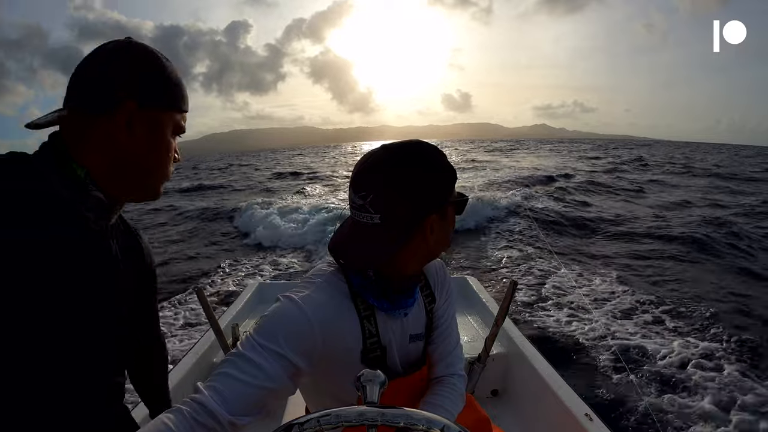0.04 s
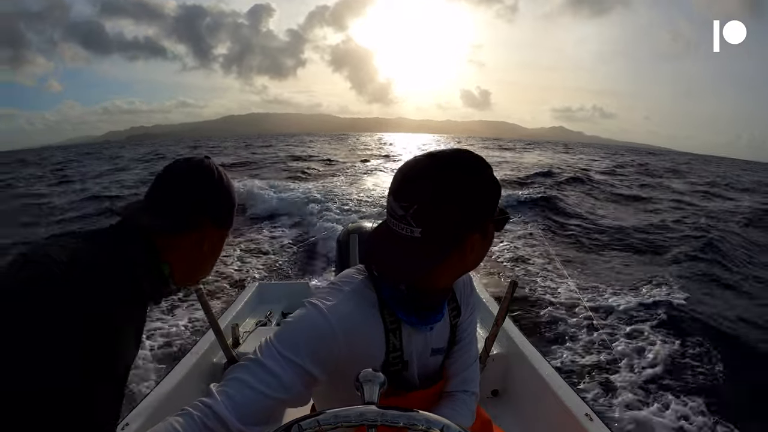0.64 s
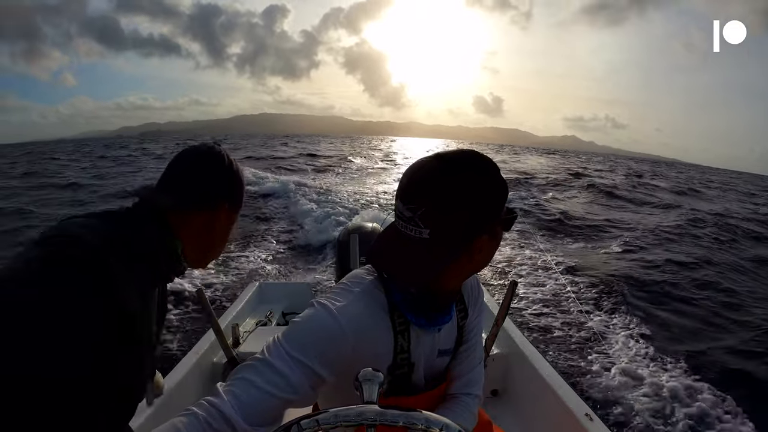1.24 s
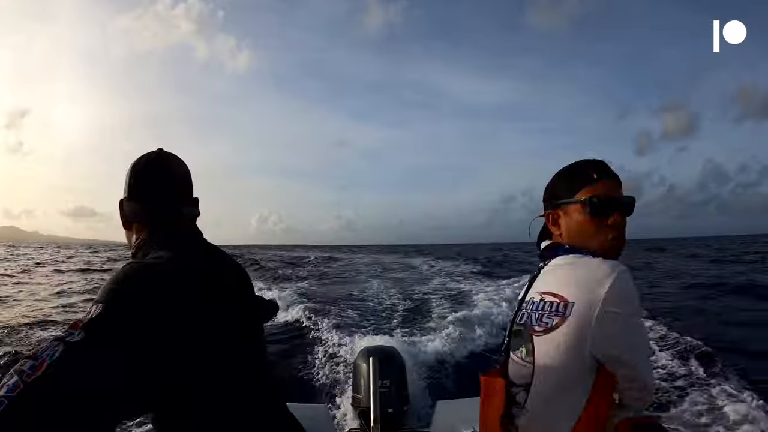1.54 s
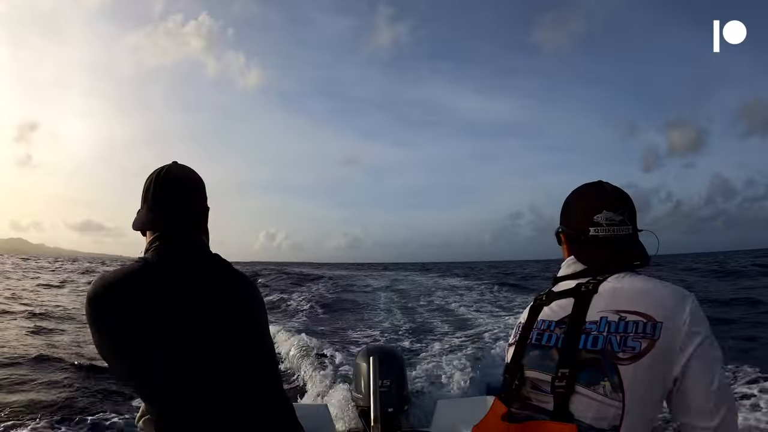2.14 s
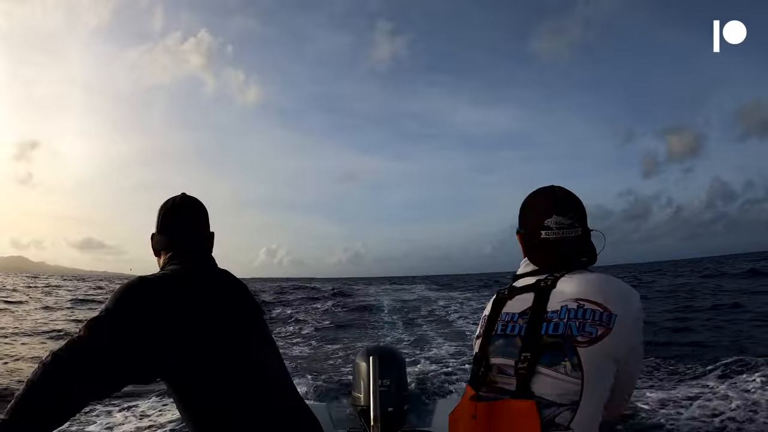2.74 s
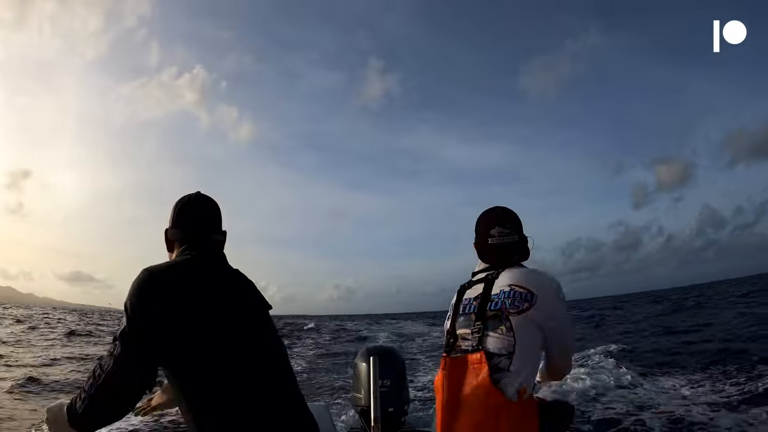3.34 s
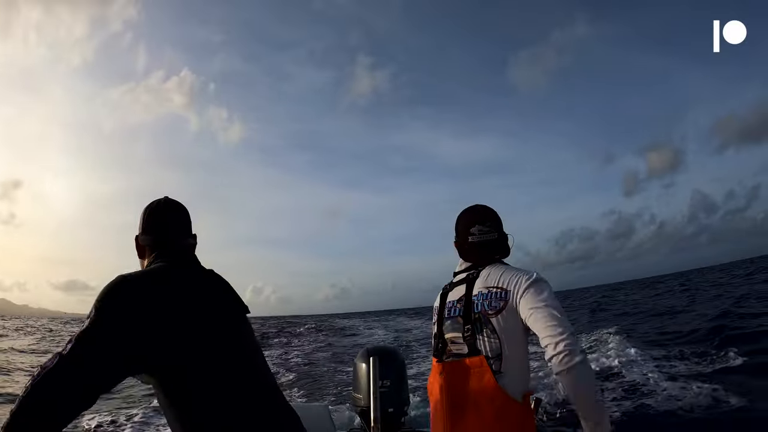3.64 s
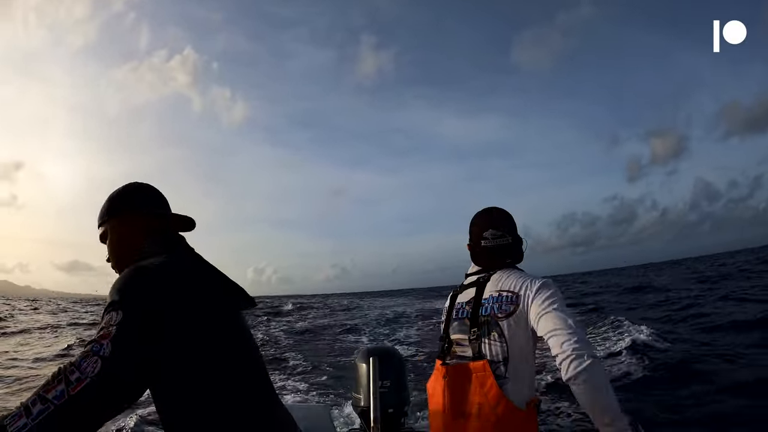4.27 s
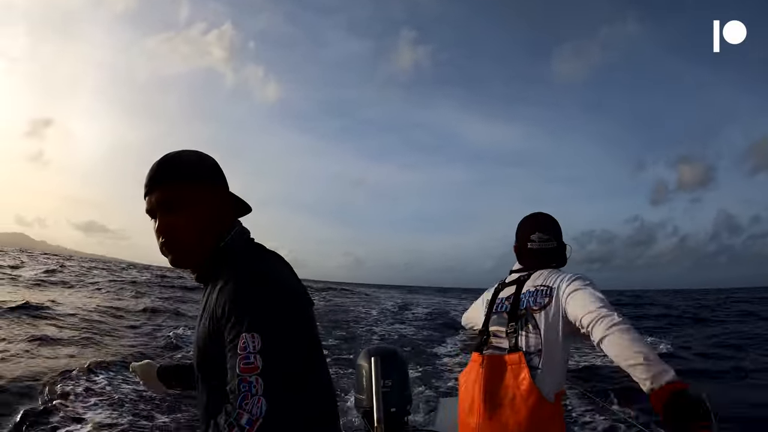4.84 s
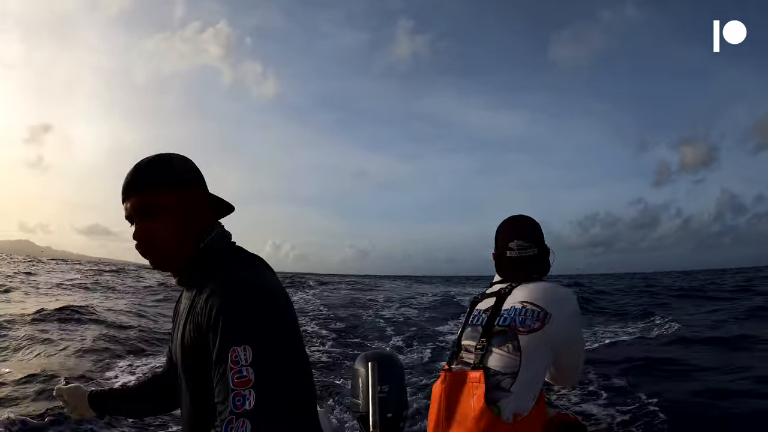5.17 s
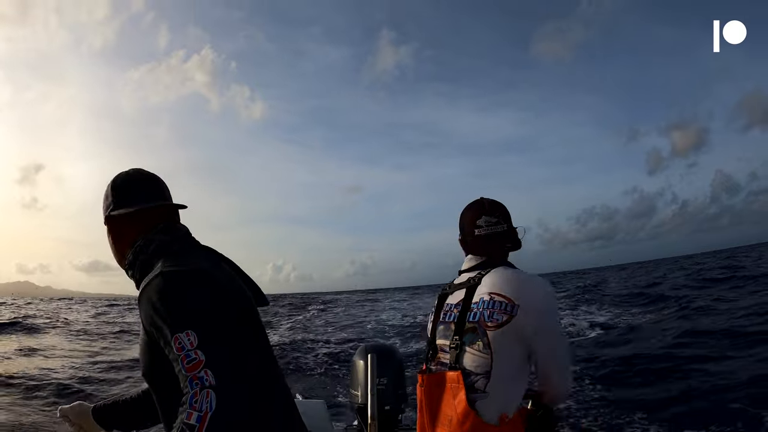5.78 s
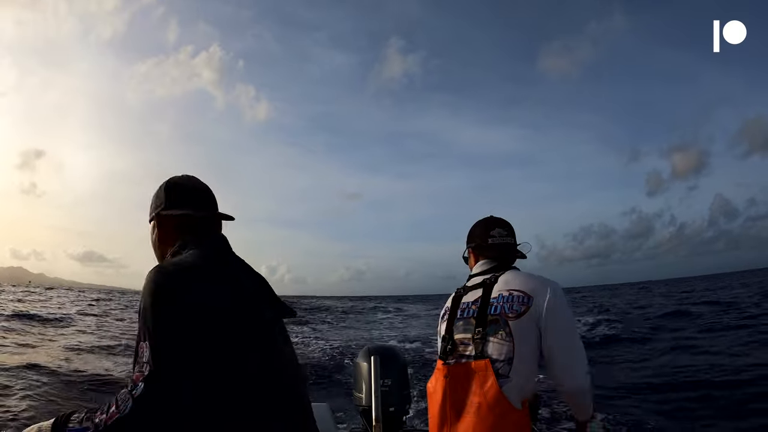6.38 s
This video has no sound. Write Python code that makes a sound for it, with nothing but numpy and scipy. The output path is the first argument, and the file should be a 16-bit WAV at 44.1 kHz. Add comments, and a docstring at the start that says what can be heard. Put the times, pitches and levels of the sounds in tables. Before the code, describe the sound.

An outboard motor drones close by at speed, with a gear whine and light mechanical clatter, while wind puffs across the microphone on board a small boat. At about 1.5 seconds the sound cuts to a brief silence. It fades back in by 1.7 seconds with the motor running a little slower under the rush and spray of the wake, strongest from 2 to 2.5 seconds, with a slap on the hull. The motor throbs around 2 and 3.7 seconds, then sinks in pitch, booms briefly near 4.5 seconds and fades into the background. From 4.7 to 6 seconds, waves thump and slap the hull in quick, uneven succession and spray spatters the deck. A loose metal fitting rattles faintly at 6 seconds. Low wind gusts buffet the microphone over softer water until the end, at about 6.5 seconds.

```python
"""An outboard motor drones at speed with a gear whine, heard close up from a small skiff on choppy sea.
After a short silence it labours and eases off under the rush of the wake. Waves thump and slap the hull,
spray lands on deck, a loose metal fitting rattles and wind buffets the on-board microphone.
The motor is a set of tones tied to its firing rate, water and wind are shaped noise,
and the hull and the fitting ring when struck."""
import sys
import numpy as np
from scipy import signal
from scipy.fft import rfft, irfft, next_fast_len
from scipy.io import wavfile
from scipy.ndimage import uniform_filter1d, map_coordinates

SR = 44100
rng = np.random.default_rng(int(sys.argv[2]) if len(sys.argv) > 2 else 0)


def transcribe(u):
    """Save the signal u as a 16-bit wav file named by the first command-line argument.

    u: samples, shape (n,) or (channels, n), limited to [-1, 1]; the rate is SR.
    q: integer samples, one column per channel.
    """
    v = np.clip(np.atleast_2d(u).T, -1, 1)
    q = np.round(v * 32767).astype(np.int16)
    wavfile.write(sys.argv[1], SR, q)


N = 287091
TIME = np.arange(N) / SR

# motor speed, cruising and easing off: (time [s], firing rate [Hz])
CRUISE_FIRING = [(0, 96.56), (.35, 95.54), (.55, 97.6), (1.0, 97.47), (1.48, 97.66)]
EASE_FIRING = [(1.64, 93.4), (1.98, 93.8), (2.28, 88.5), (2.8, 90.43), (3.05, 91.3), (3.35, 93.8),
               (3.6, 91.56), (3.8, 88.3), (4.2, 83.4), (4.45, 81.4), (4.6, 75.04), (4.8, 74.2),
               (5.5, 86.45), (6.3, 91.8)]
# tones of the drone: (multiple of firing rate [ratio], level [dB])
CRUISE_TONES = [(.5, -25.5), (1, -1), (2, -22.5), (3, -15.5), (4, -28.5), (5, -26.5), (6, -27.5), (7, -31),
                (9, -38)]
EASE_TONES = [(0.99, 0), (1.6, -25), (2, -27.5), (3.3, -24), (10 / 3, -20.5), (6, -33)]
# exhaust note, briefly smothered by the wake, then fading: (time [s], level [dB])
EXHAUST_LEVEL = [(1.78, -21.5), (2.0, -33), (2.13, -33), (2.26, -18.5), (2.98, -16), (3.1, -18.5),
                 (3.48, -21), (3.6, -20), (3.97, -22), (4.22, -29), (5.3, -36.5), (6.2, -45), (6.45, -34.5)]
# resonances: (frequency [Hz], width [Hz], level [dB])
WHINE_BANDS = [(71.3, 1.8, -37.5), (417, 3.1, -50), (704, 3.2, -54.5), (883, 16, -49.5), (1220, 24, -49),
               (1222, 8, -46.5), (1503, 8.2, -47.5), (1826, 15, -49), (3070, 36, -60.5)]  # hull, gears and cowl
PANEL_MODES = [(135.4, 20, 6), (220, 66, 7), (265, 25, 12), (366, 63, 6.5), (438, 120, 4.5),
               (626.5, 153, -1.5), (927, 200, -5.5), (1325, 257, -9), (1870, 190, -10.5), (2450, 1400, -17)]  # bottom panels
# water thrown up alongside: (time [s], wash level [dB], spray level [dB])
WAKE_LEVELS = [(1.72, -34.5, -39.5), (1.98, -24, -32.5), (2.23, -27, -37), (2.33, -24.5, -35),
               (2.55, -29, -37), (3.05, -33, -45), (3.6, -38, -47.5), (4.1, -37, -49), (4.48, -39.5, -47),
               (4.7, -32.5, -47), (5.05, -37.5, -44.5), (5.3, -32, -41.5), (5.55, -41.5, -50),
               (6.05, -39, -52.5), (6.5, -45, -53.5)]
# waves against the hull: (time [s], level [dB], nominal pitch [Hz])
WAVE_THUMPS = [(4.713, -3.5, 201), (4.76, -10, 89), (4.85, -12.5, 246), (4.997, -10.5, 231.6),
               (5.013, -8, 124.6), (5.403, -4, 97), (5.43, -7, 136), (5.456, -14, 49.4), (5.784, -16, 85.3),
               (5.845, -13, 93), (6.0, -7.5, 144.6), (6.034, -5, 48.6)]
# flat slaps underfoot: (time [s], rms level [dB], brightness [Hz], t60 [s])
PANEL_SLAPS = [(2.305, -31.5, 1300, 0.22), (2.49, -40, 1296, .35), (3.895, -43, 900, 0.36),
               (4.525, -37.5, 900, 0.65), (4.718, -28.5, 220, 0.24), (4.908, -27, 750, 0.15),
               (5.346, -27, 2003, 0.19), (5.409, -31, 650, 0.27), (5.635, -31, 500, 0.13),
               (5.902, -30, 750, 0.13), (5.997, -32, 437, 0.47)]
# spray landing on deck: (time [s], level [dB], treble edge [Hz], t60 [s])
DECK_SPLATS = [(4.904, -39.5, 7000, 0.074), (5.221, -26.5, 8080, 0.031), (5.266, -36.5, 5000, .12),
               (5.335, -45, 5000, 0.074), (5.402, -37.5, 6000, 0.35), (5.63, -35, 4240, 0.067),
               (5.737, -35.5, 5500, 0.032), (5.752, -43.5, 4200, 0.14), (5.843, -40, 4300, .11),
               (5.896, -38.5, 5010, 0.066)]
# metal contacts: (time [s], level [dB])
FITTING_HITS = [(5.988, -51), (6.003, -46.5), (6.0253, -46), (6.0586, -49.5)]
# ring of the fitting: (frequency [Hz], level [dB], t60 [s])
FITTING_MODES = [(2030, 2, 0.13), (2360, -2, .12), (3250, -9, 0.15), (3600, -12, 0.6), (4860, -2, 0.12),
                 (5150, -6.5, .08), (5450, -4, 0.073), (6000, -6.5, 0.14), (5950, -12.5, .08)]
# bell-shaped swells: (peak time [s], level [dB], half length [s])
SHAFT_THROBS = [(2.05, -22.5, 0.27), (3.72, -26.5, 0.35)]
CRUISE_PUFFS = [(.43, -23, 0.033), (.6, -27.5, 0.11), (1.39, -23.5, 0.025)]  # wind at speed
EASE_GUSTS = [(2.16, -23, 0.046), (3.08, -27, .04), (4.86, -25, 0.077), (5.1, -26.5, 0.11),
              (5.56, -21.5, .1), (6.08, -22.5, 0.15), (6.3, -29, 0.072)]  # wind while easing off
# noise spectra: (frequency [Hz], relative level [dB])
CLATTER_SPECTRUM = [(250, -8), (400, 3.5), (600, 5.5), (790, -3), (920, -2), (1100, -6), (1250, -0.5),
                    (1600, -2.5), (1880, -5.5), (2100, -12), (3100, -10), (4200, -19), (6500, -28),
                    (9000, -29), (10700, -40), (12500, -40.5), (15500, -59)]  # motor mechanics
CHURN_SPECTRUM = [(35, -31.5), (70, 1), (120, 0), (200, 0.5), (280, -1.5), (380, -16.5), (600, -33),
                  (4000, -110)]  # low turbulence of water or air
WASH_SPECTRUM = [(150, -8), (340, -5), (480, -1.5), (600, 0.5), (800, -7), (1000, -8), (1400, -20.5),
                 (2200, -27.5), (9000, -85.5)]  # water along the hull
SPRAY_SPECTRUM = [(800, -28), (1400, -11), (1750, -7), (2150, 0.5), (2800, -3), (3500, -9.5), (4300, -14),
                  (5100, -13.5), (6000, -18.5), (7500, -23.5), (8800, -23), (10500, -28.5), (11700, -42.5),
                  (15500, -58.5)]  # flying drops
FIZZ_SPECTRUM = [(2500, -14), (5000, 13.5), (9500, -18.5), (10800, -20), (12000, -27.5), (15000, -57.5)]  # finest drops
RUMBLE_SPECTRUM = [(12, -7.5), (26, 3.5), (34, 0.5), (65, -6), (100, -24), (300, -52), (2000, -120)]  # wind on the microphone
AIR_SPECTRUM = [(3000, -50.5), (8000, -16.5), (10500, -7), (12300, -0.5), (14000, -5.5), (15500, -16.5)]  # thin background hiss


def amp(db):
    """Decibels to gain."""
    return 10 ** (np.asarray(db) / 20)


def unit(x):
    """Scale to rms 1."""
    return x / np.sqrt(np.mean(x ** 2) + 1e-20)


def curves(rows):
    """One value per sample for each column after the time."""
    times, *columns = np.transpose(rows)
    return [np.interp(TIME, times, column) for column in columns]


def wobble(rate):
    """A smooth random curve, rate knots a second."""
    return map_coordinates(rng.standard_normal(int(N * rate / SR) + 4), [TIME * rate])


def swells(rows, rest_db):
    """Gain of bell-shaped swells over a resting level."""
    power = sum((amp(db) * np.exp(-.5 * ((TIME - s) / half) ** 2)) ** 2 for s, db, half in rows)
    return np.sqrt(amp(rest_db) ** 2 + power)


def filtered(x, response):
    """x through a frequency response."""
    size = next_fast_len(len(x) + SR // 4)
    return irfft(rfft(x, size) * response(np.fft.rfftfreq(size, 1 / SR)), size)[:len(x)]


def coloured(x, spectrum):
    """x shaped by a spectrum on a log frequency axis, at rms 1."""
    f, db = np.transpose(spectrum)
    return unit(filtered(x, lambda hz: amp(np.interp(np.log(hz + 1), np.log(f), db))))


def noise(spectrum, length=N):
    """Steady coloured noise at rms 1."""
    return coloured(rng.standard_normal(length), spectrum)


def resonate(x, modes):
    """x through parallel resonances of alternating sign."""
    return filtered(x, lambda f: sum(
        (-1) ** k * amp(db) * 1j * f * width / (hz * hz - f * f + 1j * f * width)
        for k, (hz, width, db) in enumerate(modes)))


def patchy(depth_db):
    """White noise with drifting patches of random gain."""
    bins = signal.stft(rng.standard_normal(N), nperseg=512)[2]
    patches = uniform_filter1d(rng.standard_normal(bins.shape), size=5, axis=0)
    patches = unit(uniform_filter1d(patches, size=10, axis=1))
    return unit(signal.istft(bins * amp(depth_db * patches), nperseg=512)[1][:N])


def add(track, s, sound):
    """Mix a sound into the track at time s."""
    part = track[round(s * SR):][:len(sound)]
    part += sound[:len(part)]


def firing_phase(rate_rows, unsteady_hz):
    """Firing angle of a motor whose speed wavers."""
    return 2 * np.pi * np.cumsum(curves(rate_rows)[0] + unsteady_hz * wobble(25.13)) / SR


def drone(phase, orders, flutter_db):
    """Exhaust and propeller tones; the weak ones flutter most as water washes over the outlet."""
    tones = np.zeros(N)
    for multiple, db in orders:
        flutter = flutter_db * min(1, 0.29 + abs(db) / 20) * wobble(14)
        tones += amp(db + flutter) * np.sin(multiple * phase + rng.uniform(0, 2 * np.pi))
    uneven_firing = amp(0.4 * wobble(90))
    return np.sqrt(2) * tones * uneven_firing


def gear_whine():
    """Hull, gears and cowl sing in narrow bands of noise."""
    out = np.zeros(N)
    for hz, width, db in WHINE_BANDS:
        band = filtered(rng.standard_normal(N), lambda f: 1 / (1 + ((f - hz) / width) ** 2))
        out += amp(db) * unit(band)
    return out


def cruising_motor():
    """The outboard at speed, close by: drone, gear whine and clatter pulsing with each firing."""
    phase = firing_phase(CRUISE_FIRING, unsteady_hz=0.42)
    exhaust = amp(-16.5 + 0.55 * wobble(7.3)) * drone(phase, CRUISE_TONES, flutter_db=1.0)
    whine = gear_whine()
    clatter = amp(-34) * unit(noise(CLATTER_SPECTRUM) * (1 + 0.1 * np.sin(phase)))
    return exhaust + whine + clatter


def easing_motor():
    """The motor labours: the shaft throbs as the propeller bites a swell; the hull booms as speed sinks."""
    boom_s, rise_db_per_s, fall_db_per_s = 4.565, 77, 101
    phase = firing_phase(EASE_FIRING, unsteady_hz=0.92)
    exhaust = amp(curves(EXHAUST_LEVEL)[0]) * drone(phase, EASE_TONES, flutter_db=3.5)
    shaft = phase / 2  # two firings a turn
    throb = swells(SHAFT_THROBS, rest_db=-39) * np.sin(shaft)
    boom_db = -16 - np.maximum(rise_db_per_s * (boom_s - TIME), fall_db_per_s * (TIME - boom_s))
    boom = amp(boom_db + 2.0 * wobble(40)) * np.sin(3 * shaft)
    return exhaust + np.sqrt(2) * (throb + boom)


def droplets(rate, spread_db):
    """Random impacts of uneven size, rate a second."""
    impacts = (rng.random(N) < rate / SR) * rng.standard_normal(N)
    return unit(impacts * amp(spread_db * np.clip(rng.standard_normal(N), -2, 2)))


def wake():
    """Just over the side: wash, the churn that follows it, and spray that fizzes brighter as it grows."""
    wash_db, spray_db = curves(WAKE_LEVELS)
    churn_db = wash_db.mean() + 7 + 0.71 * (wash_db - wash_db.mean())
    fizz_db = spray_db.max() - 26 + 2.3 * (spray_db - spray_db.max())
    churn = amp(churn_db + 1.2 * wobble(22)) * coloured(patchy(depth_db=1.0), CHURN_SPECTRUM)
    wash_gain = amp(wash_db + wobble(30))
    wash = coloured(patchy(depth_db=1.5) + .5 * droplets(rate=700, spread_db=-2.0), WASH_SPECTRUM)
    spray_gain = amp(spray_db + 0.22 * wobble(35))
    spray = coloured(patchy(depth_db=2.0) + 0.68 * droplets(rate=5000, spread_db=4.5), SPRAY_SPECTRUM)
    fizz = amp(fizz_db) * noise(FIZZ_SPECTRUM)
    return churn + wash_gain * wash + spray_gain * spray + fizz


def wave_thumps():
    """Each wave thumps the hull, sinking in pitch as more water loads it, and stirs up turbulence."""
    out, t = np.zeros(N), np.arange(SR // 2) / SR
    attack = 1 - np.exp(-t / 0.0038)
    for s, db, hz in WAVE_THUMPS:
        pitch = hz * (.82 + 0.327 * np.exp(-t / 0.041))
        t60 = 0.11 + 6.1 / hz  # deep thumps last longer
        boom = np.sin(2 * np.pi * np.cumsum(pitch) / SR) * amp(-60 * t / t60)
        stir = amp(-13.5 - 60 * t / 0.53) * noise(CHURN_SPECTRUM, len(t))
        add(out, s, amp(db) * (boom + stir) * attack)
    return out


def hull_slaps():
    """Underfoot, water runs up the bottom, meets it flat and rings the panels; soft contact is duller."""
    lead_s, contact_s = .04, .0005
    out, t = np.zeros(N), np.arange(SR // 3) / SR - lead_s
    after = np.maximum(t, 0)
    run_up = np.exp(np.minimum(t, 0) / 0.0051)
    blow = np.exp(-(2 * t / contact_s) ** 2)
    for s, db, bright_hz, t60 in PANEL_SLAPS:
        push = run_up * (amp(-60 * after / t60) + 0.82 * amp(-60 * after / 0.015))
        splash = rng.standard_normal(len(t)) * push / np.linalg.norm(push)
        ring = resonate(splash + blow / blow.sum(), PANEL_MODES)
        softened = filtered(ring, lambda f: 1 / (1 + 1j * f / (2 * bright_hz)) ** 2)
        add(out, s - lead_s, amp(db) * unit(softened))
    return out


def deck_splats():
    """Handfuls of spray land near the microphone as short bursts of drops; fine drops sound brighter."""
    out, t = np.zeros(N), np.arange(SR // 4) / SR
    attack = 1 - np.exp(-t / 0.0012)
    for s, db, edge_hz, t60 in DECK_SPLATS:
        drops = rng.standard_normal(len(t)) * amp(2.2 * rng.standard_normal(len(t)))
        spectrum = [(600, -20), (1600, -3), (2700, 0),
                    (edge_hz, -7), (2 * edge_hz, -32), (4 * edge_hz, -60)]
        add(out, s, coloured(drops, spectrum) * attack * amp(db - 60 * t / t60))
    return out


def fitting_rattle():
    """A wave shakes a loose metal fitting on board: each contact scrapes and rings it anew."""
    out, t = np.zeros(N), np.arange(SR // 2) / SR
    scrape_spectrum = [(800, -29), (2100, 4.0), (3800, -9), (5600, -6.5), (7500, -25), (15000, -38)]
    for s, db in FITTING_HITS:
        ring = np.zeros(len(t))
        for hz, mode_db, t60 in FITTING_MODES:
            decay = amp(mode_db + rng.normal(0, 2.7) - 60 * t / t60)
            ring += decay * np.sin(2 * np.pi * hz * rng.normal(1, 0.015) * t)
        scrape = 2.65 * amp(-60 * t / 0.076) * noise(scrape_spectrum, len(t))
        add(out, s, amp(db) * (ring + scrape))
    return out


def wind_buffeting():
    """Eddies strike the microphone in lumps, hardest in the gusts."""
    return swells(EASE_GUSTS, rest_db=-33.5) * amp(1.5 * wobble(12)) * noise(RUMBLE_SPECTRUM)


def cruising_wind():
    """At speed, air puffs across the microphone over a steady rumble."""
    puffs = swells(CRUISE_PUFFS, rest_db=-28) * coloured(patchy(depth_db=3.5), CHURN_SPECTRUM)
    return puffs + amp(-39.5) * noise(RUMBLE_SPECTRUM)


def scene():
    """Mono, from on board: the cruise stops short, and after a silence the slower stretch fades in."""
    stop_s, resume_s = 1.478, 1.64
    fade_out = np.clip((stop_s - TIME) / .004, 0, 1)
    fade_in = np.clip((TIME - resume_s) / 0.08, 0, 1) ** 2.6
    air = noise(AIR_SPECTRUM)
    cruising = cruising_motor() + cruising_wind() + amp(-71.5) * air
    easing = easing_motor() + wake() + wind_buffeting() + amp(-75.0) * air
    knocks = wave_thumps() + hull_slaps() + deck_splats() + fitting_rattle()
    return (fade_out * cruising + fade_in * (easing + knocks))[None]


def record(dry):
    """The microphone chain passes nothing above 15.7 kHz."""
    return np.array([filtered(x, lambda hz: hz < 15700) for x in dry])


dry = scene()
out = record(dry)
transcribe(out)
```